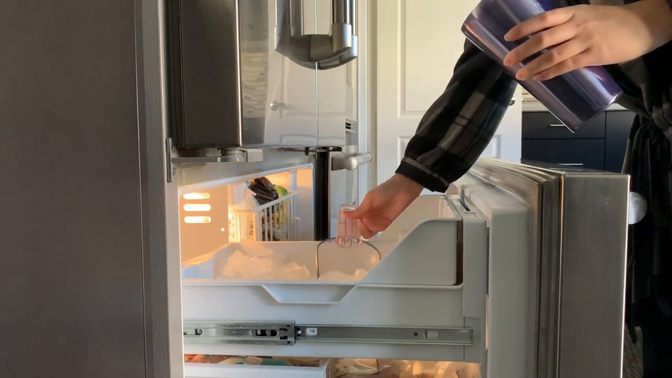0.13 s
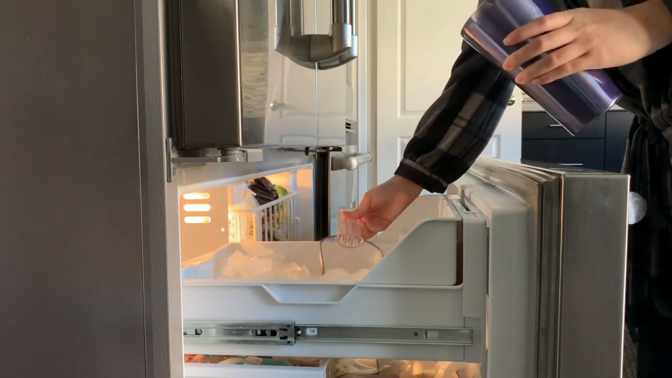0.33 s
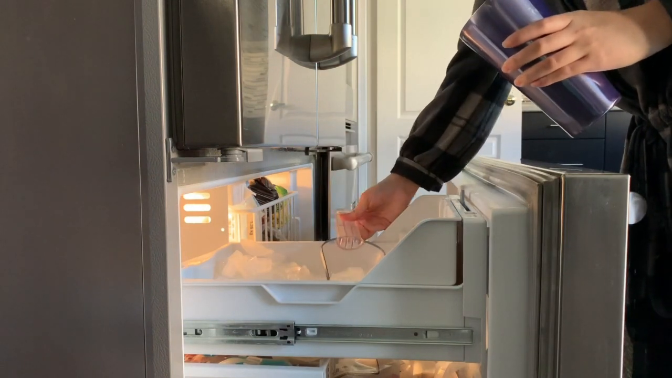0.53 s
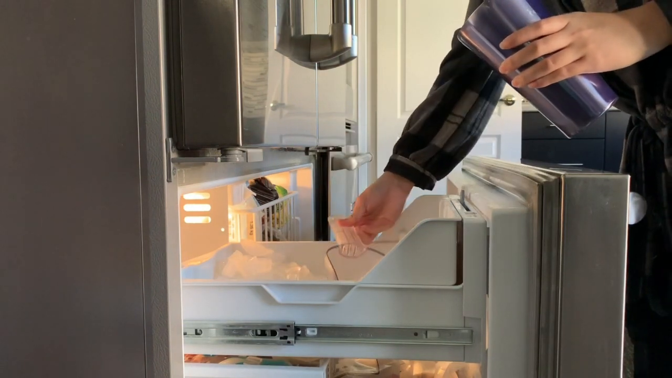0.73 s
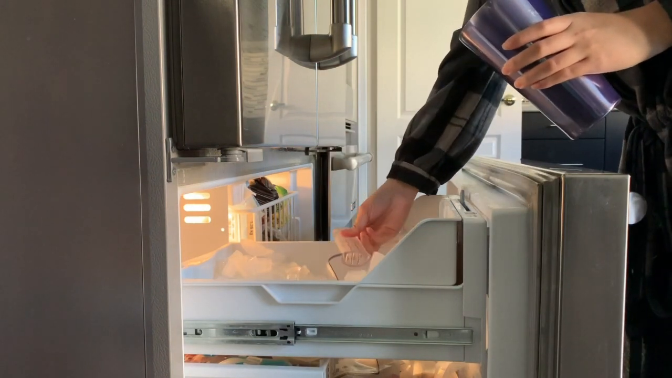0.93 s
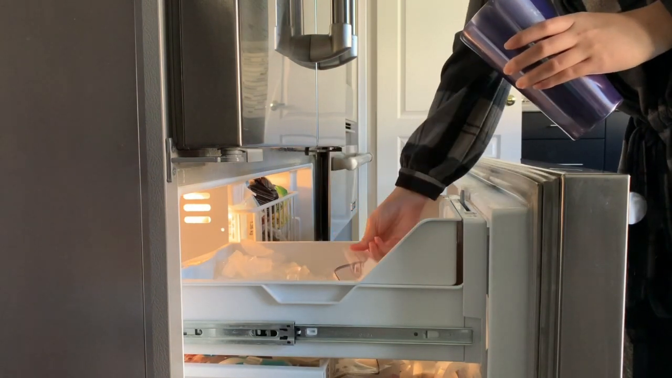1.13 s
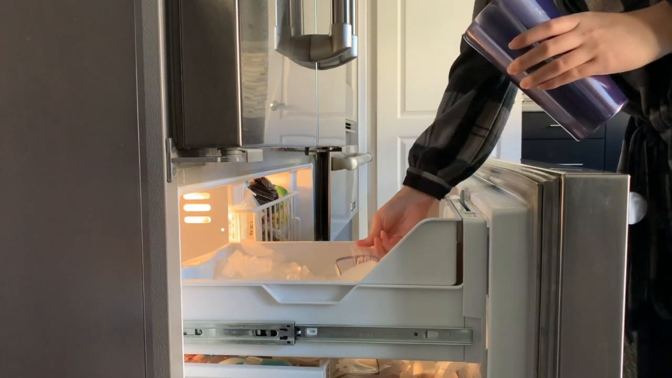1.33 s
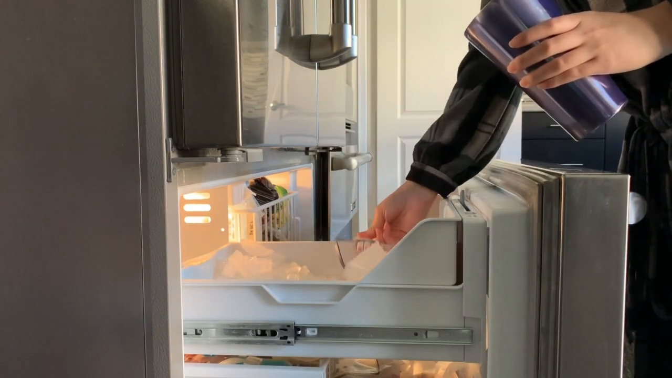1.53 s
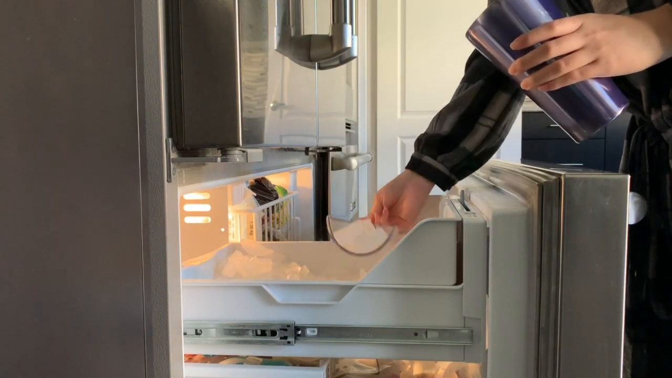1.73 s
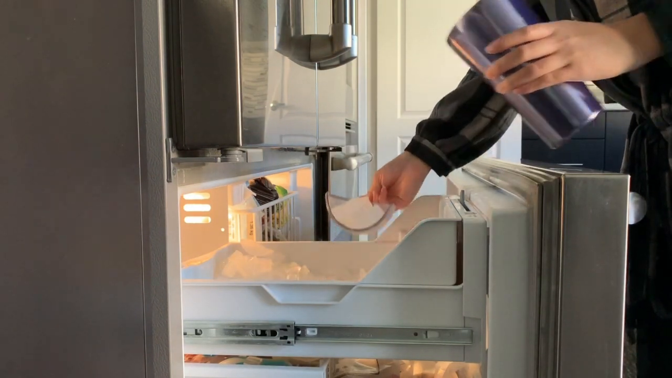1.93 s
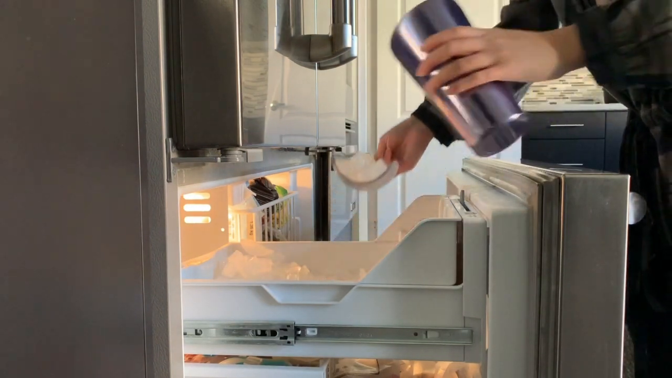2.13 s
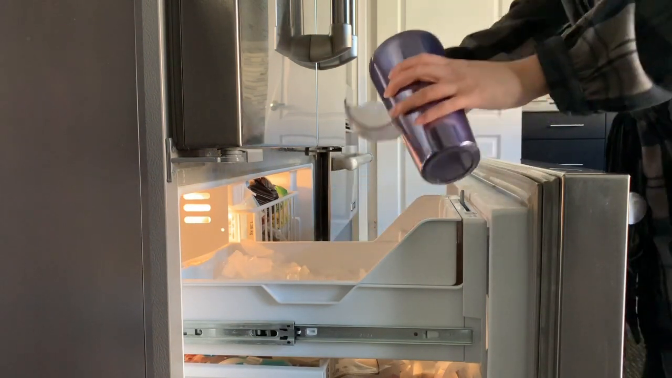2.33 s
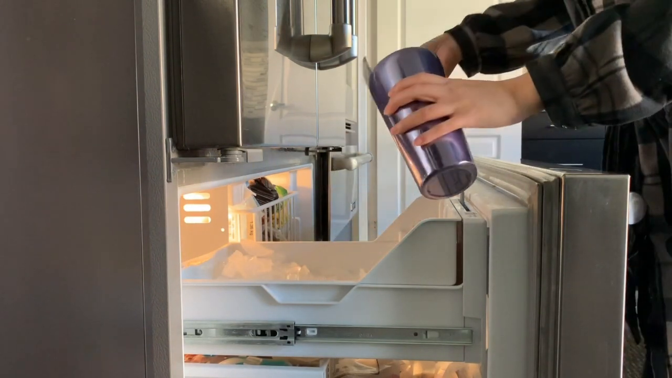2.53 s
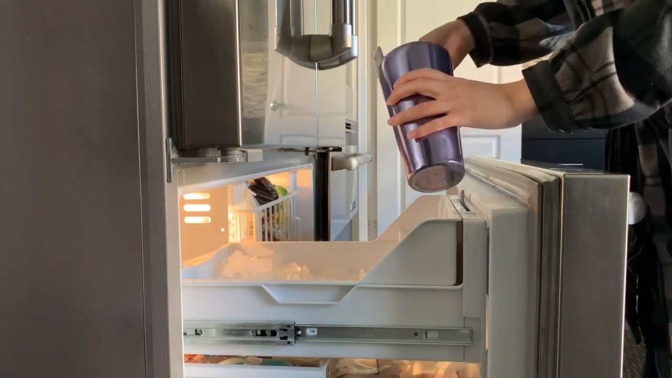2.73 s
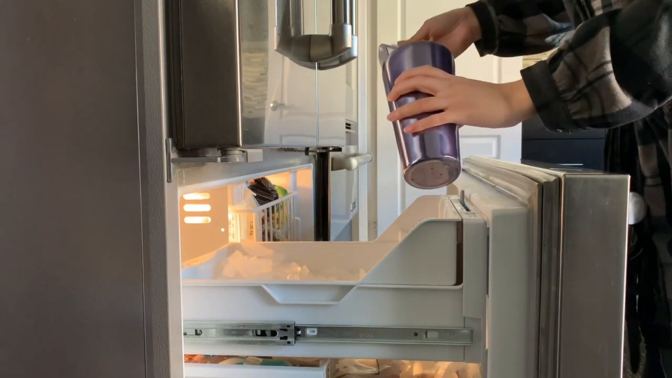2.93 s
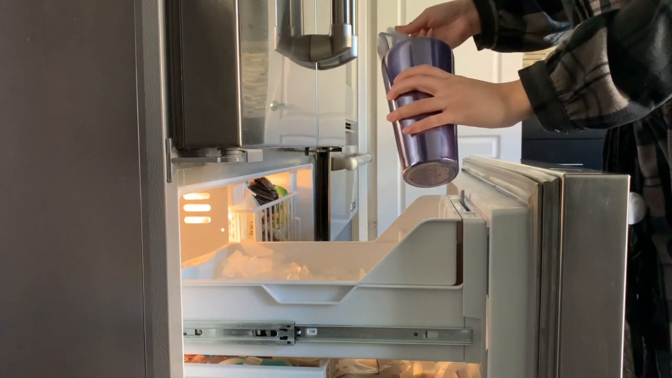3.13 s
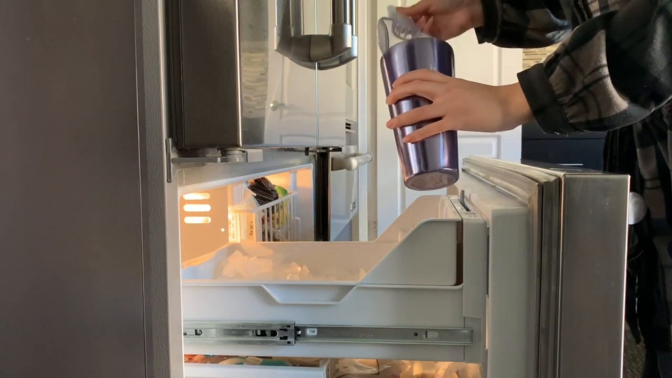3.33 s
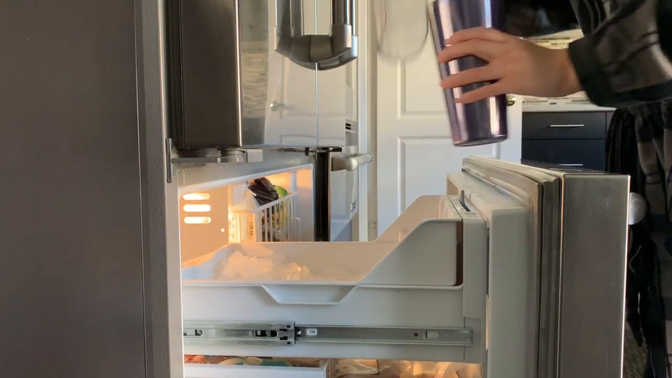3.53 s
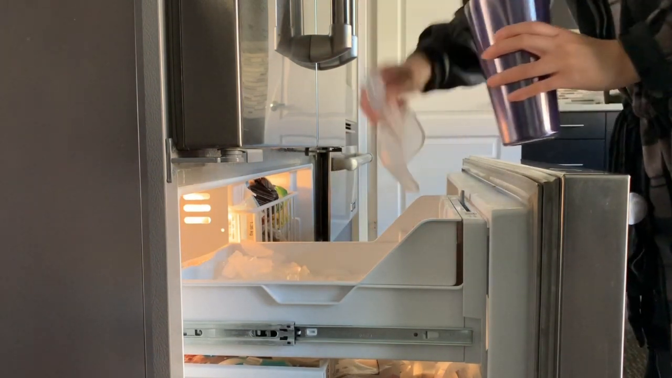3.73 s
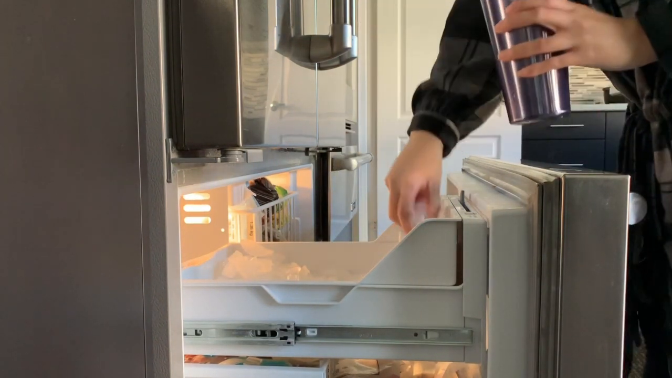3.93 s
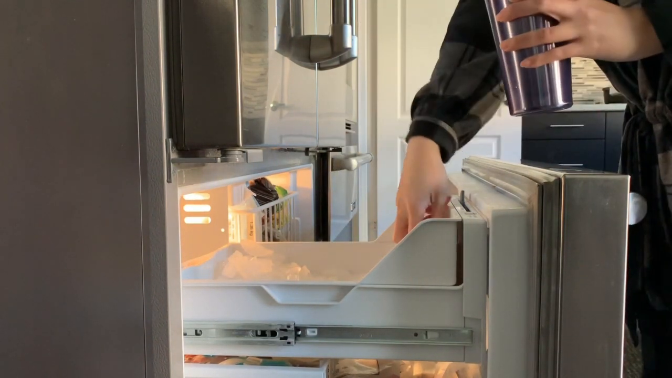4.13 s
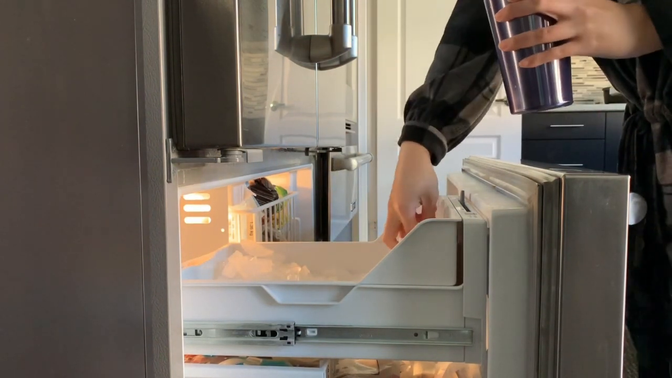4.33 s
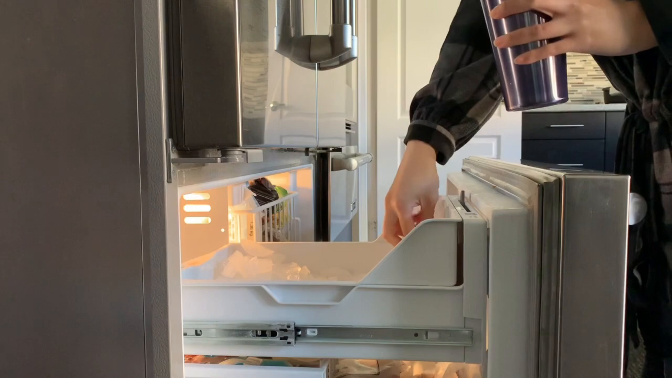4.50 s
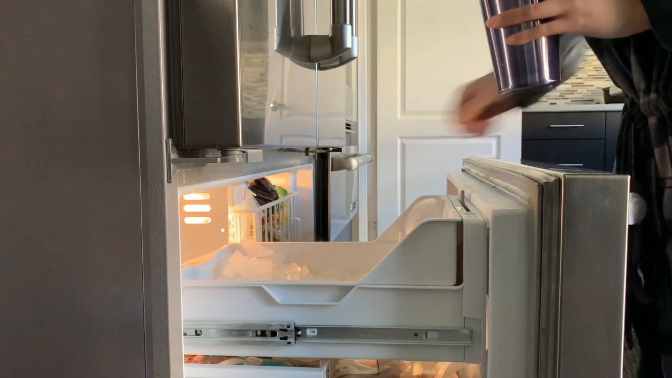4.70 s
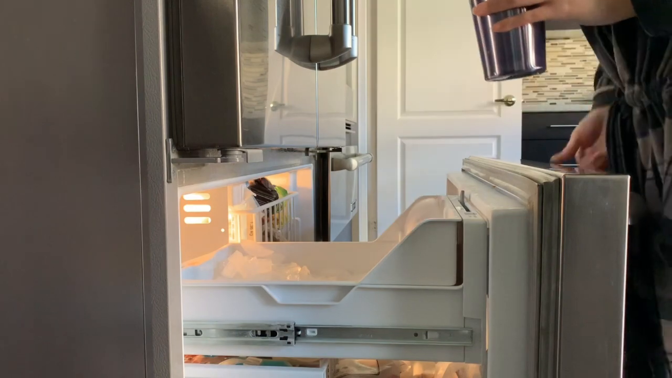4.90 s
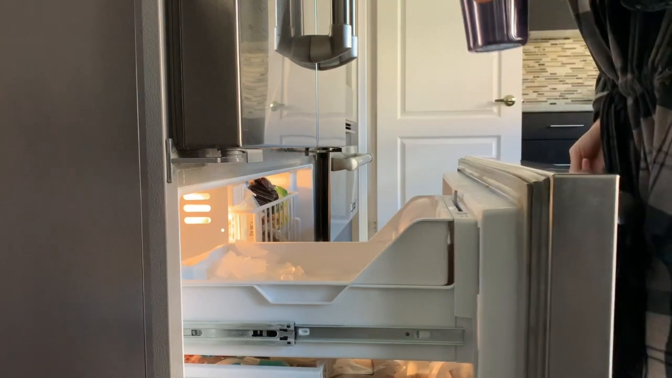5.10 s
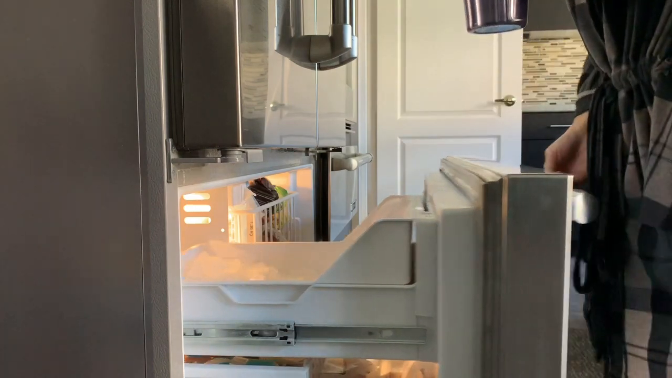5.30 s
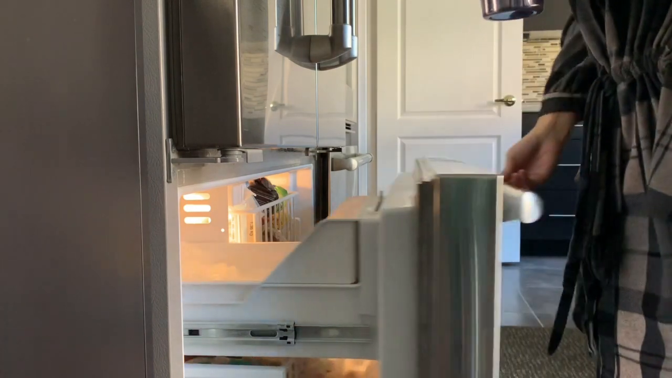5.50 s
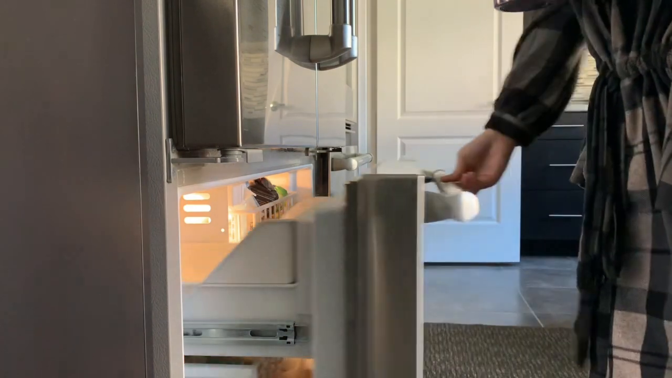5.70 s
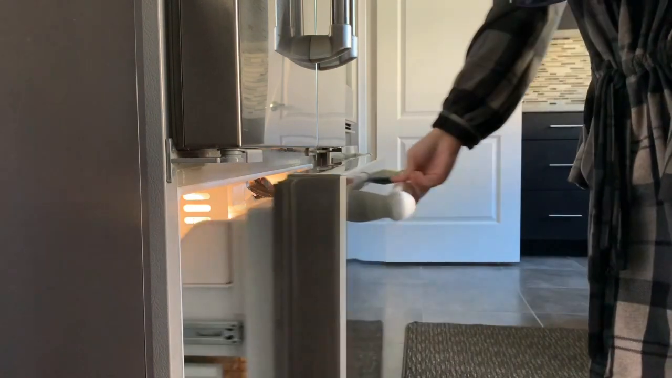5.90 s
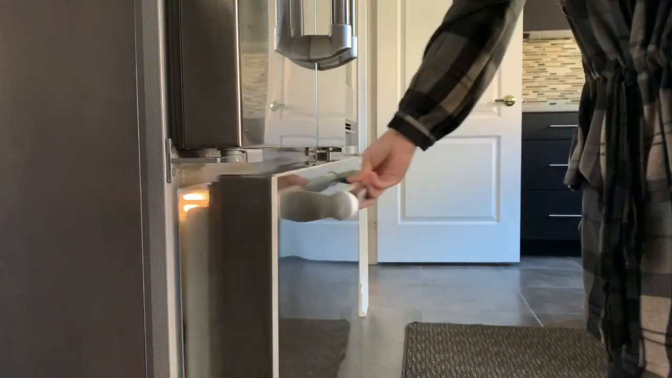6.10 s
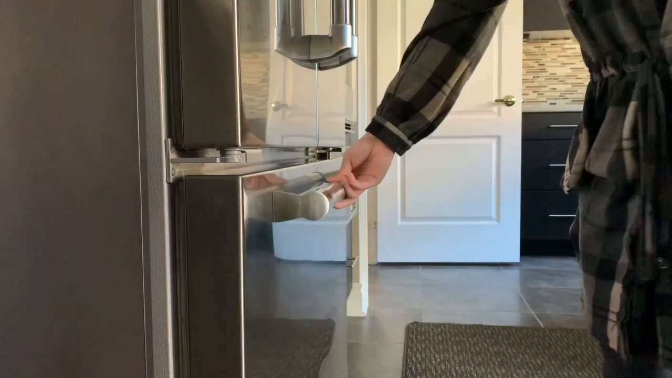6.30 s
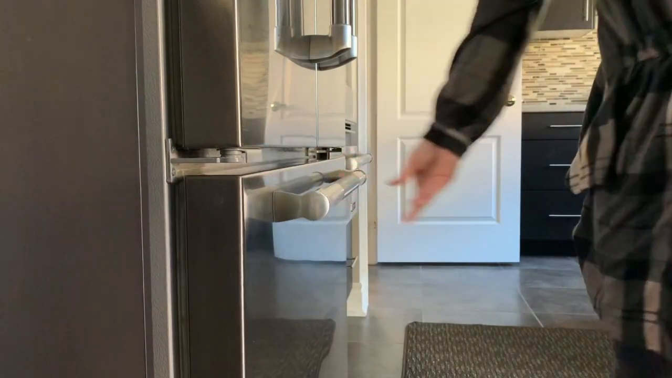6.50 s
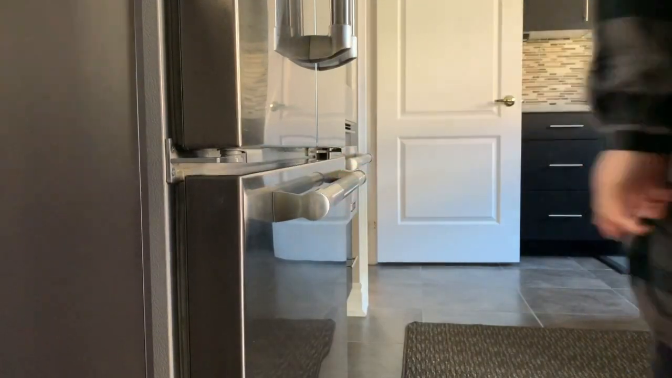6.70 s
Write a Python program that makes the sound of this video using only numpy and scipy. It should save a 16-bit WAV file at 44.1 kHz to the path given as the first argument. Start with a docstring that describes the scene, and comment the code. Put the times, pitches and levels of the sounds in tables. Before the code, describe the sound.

A small, lightly reverberant kitchen heard from close to an open freezer drawer, with low fridge hum and soft fan air throughout. From 0 to about 1.7 seconds a plastic scoop ploughs through ice cubes, grinding and crunching with many sharp knocks on the bin, strongest from 0.6 to 1.4; small cubes tick until 2.2. At 2.73 the scoop taps a steel tumbler's rim with a hollow note. From 3.1 to 3.45 cubes tumble in, ringing brightly, the ring shortening as it fills, with a last few plinks and a tiny dropout at 3.5. The empty scoop knocks at 4.0, then clatters hollowly in the bin from 4.13 to 4.35. From 5.2 the drawer rumbles along its rails, building with bumps near 5.83, a loud clack and boom at 6.11, then a latch snap and deep padded thud at 6.25-6.31, leaving hum.

```python
"""A small kitchen, with a phone close to an open freezer drawer and the fridge humming behind.
A plastic scoop digs through ice cubes, which grind and knock on the bin, then tips them into a steel tumbler.
The tumbler's wall and the air inside it ring. The empty scoop clatters back into the bin.
The drawer rolls in on its rails, latches and thuds shut. Contacts are noise cracks with decaying modes;
hum and fan are wavering tones and coloured noise."""
import sys
import numpy as np
from scipy import signal
from scipy.fft import rfft, irfft, next_fast_len
from scipy.io import wavfile
from scipy.ndimage import uniform_filter1d

SR = 44100
rng = np.random.default_rng(int(sys.argv[2]) if len(sys.argv) > 2 else 0)


def transcribe(u):
    """Save the signal u as a 16-bit wav file named by the first command-line argument.

    u: samples, shape (n,) or (channels, n), limited to [-1, 1]; the rate is SR.
    q: integer samples, one column per channel.
    """
    v = np.clip(np.atleast_2d(u).T, -1, 1)
    q = np.round(v * 32767).astype(np.int16)
    wavfile.write(sys.argv[1], SR, q)


N = 297675
TIME = np.arange(N) / SR
RING = TIME[:SR // 3]  # time within one contact

# Table levels are at the source, before the room and the microphones.
# Hardness adds to a blow's tick and takes from its thud. Crunch is the part above 5 kHz.

# Pushes of the scoop through the ice.
# Each row: start in seconds, length in seconds, level in dB, crunch in dB relative to that level.
DIG_STROKES = [(-0.02, 0.12, -26.5, -7.5), (.335, 0.089, -28.5, -4), (.505, 0.039, -30, -6.5),
               (.632, 0.025, -23.5, -7.5), (.675, 0.15, -22.5, -6.5), (.9, 0.19, -24, -6.5),
               (1.14, 0.021, -25, -3.5), (1.29, 0.085, -35, -1), (1.46, 0.28, -39, -6),
               (1.865, 0.013, -43, -17.5)]
DIG_ATTACK_S, DIG_SETTLE_DB_PER_S = 0.019, 135.5
# The loudest cubes knocking on the bin. Each row: start in seconds, level in dB, hardness in dB.
CUBE_KNOCKS = [(.086, -31.5, -2), (.2678, -32, 3.5), (.2815, -36.5, -4.5), (.319, -32.5, 4),
               (.4165, -25.5, -4.5), (.4481, -32, 0.5), (.5119, -27, -2), (.5278, -24, -1.5),
               (.5444, -48, 3.5), (.6515, -21, -1), (.6575, -22, 3), (.687, -27, 6), (.7045, -29, 1.5),
               (.7325, -26, 1), (.7403, -32.5, 14), (.7575, -29, 0.5), (.776, -33, 2), (.793, -25.5, 0.5),
               (.838, -24.5, 1), (.847, -31, -9.5), (.9005, -21, 4), (.95, -25, 2.5), (.9585, -32.5, 2.5),
               (1.0238, -26.5, -6), (1.058, -24, 1), (1.0653, -21, 2), (1.076, -20.5, -1),
               (1.098, -27.5, 0), (1.112, -28, 1), (1.1426, -29, 7.5), (1.158, -29.5, 0.5),
               (1.2179, -27.5, 11.5), (1.23, -28, 6), (1.2914, -26, 0.5), (1.3468, -23, -2.5),
               (1.3644, -29, 2.5), (1.4635, -23.5, -4.5), (1.4944, -39, 3), (1.5658, -33, -5),
               (1.6055, -32, -4), (1.6841, -29, -0.5), (1.843, -36.5, -2), (1.854, -34, -5),
               (1.8726, -30, 9), (1.8885, -29.5, -2.5), (1.9082, -31, -0.5), (1.947, -37, -4),
               (2.143, -34.5, -3.5), (2.1975, -43.5, -7)]
# Spectrum of ice cracking on plastic. Each row: frequency in Hz, relative density in dB per Hz.
ICE_COLOUR = [(54, -17), (90, -2.5), (140, -17.5), (220, -9.5), (430, 5), (700, 1.5), (1050, -0.5),
              (1500, 1.5), (2500, -0.5), (4200, -13), (5800, -25), (9000, -23.5), (15000, -28.5)]
# Modes of the plastic bin. Each row: mean frequency in Hz, mean relative level in dB, t60 in seconds.
BIN_MODES = [(198, -10, 0.063), (286, -7, 0.1), (429, -5, 0.06), (507, -7, 0.06), (614, -8, 0.06),
             (675, 0, 0.06), (880, 1, 0.05), (1005, -2, .07), (1404, -1, 0.055), (1604, -2, 0.06),
             (2180, -10, .025), (2436, -10, 0.025), (3500, -13, .025)]


def ice_bin():
    """The scoop ploughs through the cubes, which grind and knock on the plastic bin."""
    force = strokes(DIG_STROKES, DIG_ATTACK_S, DIG_SETTLE_DB_PER_S)
    grind = rattle(force, ICE_COLOUR, BIN_MODES,
                   per_s=270, spread_db=18, t60=.032, ring_db=-3, count=32)
    knocks = blows(CUBE_KNOCKS, ICE_COLOUR, BIN_MODES,
                   t60=0.04, ring_db=-9.5, thud_db=-2.0, tick_db=-5.5)
    return kitchen(grind + knocks, wet_db=-3.5)


# The scoop taps the tumbler's rim. Each row: start in seconds, level in dB, hardness in dB.
RIM_TAPS = [(2.7265, -29.5, 1), (2.7886, -39, -6)]
# Ice shifting in the scoop and leaving it: a trickle, the load, the last cubes.
# Each row: start in seconds, length in seconds, level in dB, crunch in dB relative to that level.
POUR_SLIDES = [(2.73, .08, -45, -4), (2.99, 0.09, -48, 6), (3.075, .05, -46, 9), (3.122, 0.12, -30, 7),
               (3.27, .07, -37, 7), (3.375, 0.05, -38, 2), (3.6, .1, -60, -10)]
POUR_ATTACK_S, POUR_SETTLE_DB_PER_S = 0.011, 149
# Cubes dropping in, each ringing two notes of the wall. Each row: start in seconds, level in dB,
# hardness in dB, main note in Hz, its level in dB, second note in Hz, its level in dB.
TUMBLER_HITS = [(3.0114, -43, 0, 2853, -39, 1848, -42), (3.093, -38, 4, 2853, -28, 1848, -37),
                (3.1235, -17.5, 0, 2050, -13, 2520, -19), (3.1385, -26, 6, 3591, -18, 2085, -22),
                (3.1445, -27, 3, 3296, -23, 3649, -23), (3.1644, -28, 4, 3649, -26, 2085, -23),
                (3.1991, -22.5, 3, 2806, -20, 2050, -20), (3.2195, -20.5, 7, 2571, -14, 2806, -18),
                (3.2364, -29, 4, 2806, -17, 2520, -19), (3.2555, -21, 2, 2050, -14.5, 1848, -22),
                (3.261, -26, 1, 3296, -15.5, 3210, -21), (3.2874, -28, 2, 2085, -22, 3591, -28),
                (3.3414, -29, -1, 2595, -29, 3210, -28), (3.3804, -29, 11, 2853, -26, 3210, -29),
                (3.3965, -27, 11, 1848, -25, 2755, -27), (3.4544, -34, -3, 1848, -33, 3210, -36),
                (3.533, -46, -2, 2870, -36, 1868, -46), (3.5595, -40, 9, 2885, -25, 1868, -33),
                (3.6526, -49, -5, 1848, -46, 2885, -54), (3.743, -56, -8, 1848, -53, 2885, -58)]
# The wall rings shorter as ice fills the tumbler. Each row: time in seconds, t60 in seconds.
WALL_DECAY = [(3.12, .21), (3.3, .16), (3.55, .13)]
# Spectrum of cracks on steel. Each row: frequency in Hz, relative density in dB per Hz.
STEEL_COLOUR = [(150, -50.5), (250, -18.5), (420, -8.5), (620, 0), (900, -18), (1400, -4.5), (2100, -9.5),
                (3000, -8), (3700, -7.5), (4400, -14.5), (5300, -17), (7500, -23), (10000, -19.5),
                (15000, -23.5)]
# Modes of the tumbler, covered for the rim taps and then open.
# Each row: mean frequency in Hz, mean relative level in dB, t60 in seconds.
COVERED_MODES = [(1733, -3, .12), (2067, -1, .12), (2560, 0, .12), (2805, 0, .1), (3521, -3, .12),
                 (3935, -4, .12), (4350, -4, .12)]
TUMBLER_MODES = [(1346, -1, 0.06), (1560, -1, .05), (1848, -3, .07), (2075, -2, 0.08), (2520, 0, 0.06),
                 (2595, -4, .09), (2806, -3, 0.08), (3210, -7, .08), (3296, -7, .09), (3620, -3, 0.09),
                 (4732, -10, 0.08), (5250, -7, .06), (6050, -9, 0.06), (6700, -6, 0.08)]


def tumbler():
    """The scoop taps the rim, then cubes tumble down the steel wall; the growing load damps its notes."""
    taps = blows(RIM_TAPS, STEEL_COLOUR, COVERED_MODES,
                 t60=.036, ring_db=-10, thud_db=-4.5, tick_db=-3.5)
    flow = strokes(POUR_SLIDES, POUR_ATTACK_S, POUR_SETTLE_DB_PER_S)
    slide = rattle(flow, STEEL_COLOUR, TUMBLER_MODES, per_s=190, spread_db=14, t60=0.025, ring_db=-4)
    hits = blows(TUMBLER_HITS, STEEL_COLOUR, TUMBLER_MODES,
                 t60=.03, ring_db=-6, thud_db=-10.5, tick_db=-11.0, focus_db=6)
    times, _, _, main_hz, main_db, second_hz, second_db = np.transpose(TUMBLER_HITS)
    decay = np.interp(times, *np.transpose(WALL_DECAY))
    wall = notes(times, main_hz, main_db, decay) + notes(times, second_hz, second_db, decay)
    ringing = kitchen(wall + hollow(), wet_db=-15)
    return ringing + kitchen(taps + slide + hits, wet_db=-3)


# Pushes on the air in the tumbler, its note shifting as scoop and ice cover the mouth.
# Each row: start in seconds, centre of the wavering note in Hz, level in dB.
HOLLOW = [(2.7265, 544, -21), (2.7886, 528, -30), (3.0114, 550, -40), (3.06, 560, -40), (3.093, 580, -38),
          (3.1385, 612, -23), (3.1644, 618, -23), (3.1991, 628, -19), (3.2195, 622, -19),
          (3.2555, 615, -25), (3.3414, 590, -28), (3.3965, 640, -34), (3.4544, 600, -40),
          (3.5595, 600, -48)]
HOLLOW_T60_S, HOLLOW_WAVER = .24, .022  # waver as a fraction of the pitch


def hollow():
    """The air in the tumbler: one note, topped up by each push and bent as scoop and ice cover the mouth."""
    power = np.zeros((1, N))
    for s, _, db in HOLLOW:
        push = (1 - np.exp(-RING / BODY_RISE_S)) * amp(db - 60 * RING / HOLLOW_T60_S)
        add(power, s, push[None] ** 2)
    waver = np.interp(TIME, np.linspace(0, TIME[-1], 900), rng.standard_normal(900))
    hz = np.interp(TIME, *np.transpose(HOLLOW)[:2]) * (1 + HOLLOW_WAVER * waver)
    turns = np.cumsum(hz) / SR + np.array([[0], [1 / 4]])  # second channel a quarter turn away
    return np.sqrt(2 * power) * np.sin(2 * np.pi * turns)


# The empty scoop settling in the bin.
# Each row: start in seconds, level in dB, hardness in dB, note in Hz, note level in dB.
SCOOP_KNOCKS = [(3.9851, -24.5, -3, 780, -24.5), (4.132, -38.5, 7.5, 424.6, -26.5),
                (4.1524, -34.5, -9.5, 640, -41), (4.174, -24, 2, 602, -16.5),
                (4.2013, -31, -5.5, 823, -15.5), (4.2335, -38, -4.5, 1394, -40),
                (4.2786, -21.5, 0.5, 614, -12.5), (4.2962, -23.5, 5, 436, -9), (4.3255, -22.5, 1, 840, -10),
                (4.4055, -42, -8.5, 720, -47.5), (4.5025, -41.5, 5.5, 1490, -36)]
# Loose cubes shifted by the empty scoop.
# Each row: start in seconds, length in seconds, level in dB, crunch in dB relative to that level.
CUBE_NUDGES = [(4.125, .12, -38, -12), (4.28, .06, -34, -10)]
# Spectrum of the scoop's cracks. Each row: frequency in Hz, relative density in dB per Hz.
SCOOP_COLOUR = [(114, -30), (190, -7.5), (300, -7.5), (410, -1), (800, 5), (1200, -4), (1600, -1.5),
                (2000, -10.5), (3300, -12), (6000, -27.5), (8500, -24), (11000, -30.5), (15000, -39)]
# Modes of the scoop. Each row: mean frequency in Hz, mean relative level in dB, t60 in seconds.
SCOOP_MODES = [(199, -4, .15), (300, -4, .07), (407, 2, .11), (495, 1, .06), (632, 3, .07), (671, 3, .07),
               (833, 3, .08), (1005, -4, .04), (1370, -2, .04), (1645, -1, .04)]


def scoop():
    """The empty scoop clatters into the bin, another hollow note at each knock, and nudges loose cubes."""
    knocks = blows(SCOOP_KNOCKS, SCOOP_COLOUR, SCOOP_MODES,
                   t60=.032, ring_db=-9, thud_db=0.5, tick_db=-12)
    times, _, _, hz, db = np.transpose(SCOOP_KNOCKS)
    shell = pan(notes(times, hz, db, t60=.05), left_db=4)
    nudge = strokes(CUBE_NUDGES, DIG_ATTACK_S, DIG_SETTLE_DB_PER_S)
    cubes = rattle(nudge, ICE_COLOUR, SCOOP_MODES, per_s=220, spread_db=14, t60=.025, ring_db=-5)
    return pan(kitchen(knocks + shell + cubes, wet_db=-9), left_db=1)


# The drawer gathers speed along its rails, then the closer brakes it.
# Each row: time in seconds, level in dB.
ROLL_CURVE = [(5.15, -59), (5.25, -46.5), (5.5, -35), (5.8, -34), (5.9, -25.5), (6.0, -35), (6.17, -31),
              (6.21, -32.5), (6.24, -28)]
BEARING_HISS_DB = -19.5  # roll above 5 kHz, relative to its body
# The hand takes the handle, then the drawer bumps along its rails and lands.
# Each row: start in seconds, level in dB, hardness in dB.
DRAWER_KNOCKS = [(5.012, -63, -7.5), (5.2314, -55.5, -9.5), (5.252, -52, -6.5), (5.6226, -41.5, -0.5),
                 (5.7054, -43, 0.5), (5.7568, -44.5, 10.5), (5.8195, -33.5, 16.5), (5.8255, -30, -2),
                 (5.8354, -32.5, 0), (5.8894, -51.5, -17), (5.9774, -54, -13), (6.1095, -23, 5.5),
                 (6.2425, -34, -8), (6.2574, -45, -9.5), (6.311, -29.5, -4.5)]
# The baskets shake as the door lands.
# Each row: start in seconds, length in seconds, level in dB, crunch in dB relative to that level.
SHUDDER = [(6.228, 0.13, -24, -26.5), (6.37, 0.11, -40, -45)]
SHUDDER_ATTACK_S, SHUDDER_SETTLE_DB_PER_S = 0.011, 129.5
# The door meets its seal. Each row: start in seconds, level in dB over the first 50 ms.
DOOR_THUDS = [(5.826, -36.5), (6.254, -27), (6.31, -18.5)]
SEAL_RISE_S = .006
# Spectra of the drawer's knocks and of its rolling and shaking.
# Each row: frequency in Hz, relative density in dB per Hz.
DRAWER_COLOUR = [(42, -12), (70, 11.5), (150, -4.5), (300, -0.5), (480, 7), (900, -4), (1400, -9),
                 (2100, -19), (4200, -13), (5800, -13.5), (9000, -10.5), (15000, -14.5)]
RAIL_COLOUR = [(54, -22), (90, 7), (200, 5), (430, 9.5), (700, -0.5), (1500, -9), (2200, -18), (4000, -23),
               (6000, -34.5), (9000, -31), (15000, -38)]
# Modes of the drawer and of the cabinet around it.
# Each row: mean frequency in Hz, mean relative level in dB, t60 in seconds.
DRAWER_MODES = [(242, -8, .15), (298, 13, .09), (343, 4, .16), (423.5, 4, .25), (515, 4.5, .11),
                (740, -2, .06), (1170, -7, .05), (1480, -12, .03), (4340, -9, .04)]
CABINET_MODES = [(36, 5.5, .18), (50, 4.5, .22), (64, 0, .2), (80, -3, .2), (146, 10, .2), (205, 0, .1),
                 (255, -6, .13), (390, -16, .3)]


def drawer():
    """Bearings rumble along the rails, the slides catch, and the door shakes baskets and cabinet."""
    speed = amp(np.interp(TIME, *np.transpose(ROLL_CURVE), left=-np.inf, right=-np.inf))
    roll = rattle([speed, speed * amp(BEARING_HISS_DB)], RAIL_COLOUR, DRAWER_MODES,
                  per_s=680, spread_db=10, t60=0.04, ring_db=-10)
    shake = strokes(SHUDDER, SHUDDER_ATTACK_S, SHUDDER_SETTLE_DB_PER_S)
    baskets = rattle(shake, RAIL_COLOUR, DRAWER_MODES,
                     per_s=630, spread_db=15.5, t60=0.068, ring_db=-28.5)
    knocks = blows(DRAWER_KNOCKS, DRAWER_COLOUR, DRAWER_MODES,
                   t60=0.11, ring_db=-3.5, thud_db=6.5, tick_db=-2.5)
    out = roll + rail_bumps() + baskets + knocks
    for s, db in DOOR_THUDS:
        # the soft seal spreads the push over a few milliseconds
        thud = ring(CABINET_MODES) * (1 - np.exp(-RING / SEAL_RISE_S))
        add(out, s, amp(db) * thud / rms(thud[:, :SR // 20]))
    return kitchen(out, wet_db=-8.5)


# The rollers bump along the rails and the tub booms.
# Each row: start in seconds, level in dB before the shared trim BUMP_DB, pitch in Hz.
RAIL_BUMPS = [(5.373, -25, 427), (5.537, -28, 493), (5.582, -26.5, 431), (5.604, -27.5, 420),
              (5.69, -26.5, 348), (5.731, -28, 403), (5.775, -30, 358), (5.826, -14.5, 493),
              (5.888, -11, 347), (6.0, -17.5, 466), (6.028, -18, 280), (6.06, -18.5, 401),
              (6.109, -3, 314.4), (6.234, -18.5, 300)]
BUMP_DB, BUMP_T60_S = -7, .14


def rail_bumps():
    """Each bump of the rollers makes the drawer's tub boom briefly at another pitch."""
    times, db, hz = np.transpose(RAIL_BUMPS)
    return notes(times, hz, db + BUMP_DB, t60=BUMP_T60_S)


# The closer's spring and catch. Each row: start in seconds, level in dB, hardness in dB.
LATCH_SNAPS = [(6.1025, -33, 8), (6.1085, -27, 4), (6.3055, -33, 4), (6.3095, -22.5, 0)]
# Spectrum of the snaps. Each row: frequency in Hz, relative density in dB per Hz.
LATCH_COLOUR = [(200, -8), (1400, -2), (2300, -28), (3400, -4), (4500, 1), (6000, -21), (8500, -9),
                (15000, -24)]
# Modes of the latch. Each row: mean frequency in Hz, mean relative level in dB, t60 in seconds.
LATCH_MODES = [(1440, -1, .03), (3410, -1, .015), (4300, -4, .015), (7900, -7, .015)]


def latch():
    """The sprung closer gives two double snaps: as it takes hold of the drawer and as it pulls it home."""
    snaps = blows(LATCH_SNAPS, LATCH_COLOUR, LATCH_MODES, t60=.016, ring_db=-7, thud_db=-3, tick_db=-4)
    return kitchen(snaps, wet_db=-15)


# Spectrum of the freezer fan. Each row: frequency in Hz, relative density in dB per Hz.
FAN_COLOUR = [(15, -42), (25, -27.5), (49, -7), (128, -7.5), (146, -11.5), (207, -2), (250, -11.5),
              (354, -18), (383, -8.5), (529, -19), (1150, -29.5), (1280, -21), (1500, -45), (15000, -62)]
FAN_DB = -48
# Compressor and fan tones. Each row: mean frequency in Hz, level in dB.
HUM = [(59.2, -52), (118.4, -58), (172.3, -58), (382, -64), (1244, -77), (3612, -86)]


def fridge():
    """Compressor and fan tones, wavering a little in pitch, over the rush of the freezer fan."""
    air = colour(rng.standard_normal((2, N)), FAN_COLOUR)
    tones = 0
    for hz, db in HUM:
        waver = np.interp(TIME, np.linspace(0, TIME[-1], 100), rng.standard_normal(100))
        turns = np.cumsum(hz * (1 + .006 * waver)) / SR + rng.random((2, 1))
        tones = tones + amp(db) * np.sqrt(2) * np.sin(2 * np.pi * turns)
    return amp(FAN_DB) * air / rms(air) + tones


# Reverberation of the small kitchen. Each row: frequency in Hz, t60 in seconds.
KITCHEN = [(100, 0.48), (300, 0.54), (1800, 0.53), (4800, 0.48), (9000, 0.26), (15000, 0.16)]


def kitchen(x, wet_db):
    """Direct sound plus a diffuse tail that dies soonest in the treble."""
    t = TIME[:SR]
    hz = np.fft.rfftfreq(SR, 1 / SR)
    noise = rfft(rng.standard_normal((2, SR)))
    centres = [f for f, _ in KITCHEN]
    tail = 0
    # overlapping bands of noise, each with its own decay
    for share, (_, t60) in zip(np.eye(len(KITCHEN)), KITCHEN):
        tail = tail + irfft(noise * on_log(hz, np.c_[centres, share])) * amp(-60 * t / t60)
    tail = tail * (1 - np.exp(-t / 0.00064))
    tail = tail / rms(tail) / np.sqrt(SR)
    return x + amp(wet_db) * signal.fftconvolve(x, tail, axes=1)[:, :N]


def strokes(table, attack_s, settle_db_per_s):
    """Strength of a movement and of its crunch: each stroke swells, holds to its length, then dies away."""
    power = 0
    for s, length, db, crunch in table:
        settle = amp(-settle_db_per_s * np.maximum(TIME - s - length, 0))
        swell = np.clip((TIME - s) / attack_s, 0, 1) * settle
        power = power + (swell * amp([[db], [db + crunch]])) ** 2
    return np.sqrt(power)


def rattle(force, spectrum, modes, per_s, spread_db, t60, ring_db, count=16):
    """Many small contacts of differently ringing pieces; the force sets the strength of body and top."""
    first, last = np.flatnonzero(force[0] > amp(-85))[[0, -1]]
    grains = 0
    for _ in range(count):
        chance, size = rng.random((2, N))[:, first:last]
        pushes = (chance < per_s / count / SR) * amp(spread_db * size ** 2)
        piece = contact(spectrum, modes, t60, ring_db)
        grains = grains + signal.fftconvolve(pushes[None], piece, axes=1)[:, :last - first]
    body, top = np.zeros((2, 2, N))
    body[:, first:last] = even(band(grains, 40, 5000))
    top[:, first:last] = even(band(grains, 5000, 16000))
    return force[0] * body + force[1] * top


FOCUS_OCTAVES = .35  # reach of the crack's gathering around a note


def blows(table, spectrum, modes, t60, ring_db, thud_db, tick_db, focus_db=0, count=2):
    """Separate blows; a harder one has more tick, less thud. The crack can gather around the blow's note."""
    out = np.zeros((2, N))
    for s, db, hardness, *note in table:
        hit = contact(spectrum, modes, t60, ring_db)
        if focus_db:
            hit = shape(hit, lambda hz: amp(
                focus_db * np.exp(-(np.log2((hz + 1) / note[0]) / FOCUS_OCTAVES) ** 2)))
        # thud, body and tick of the first 20 ms are brought to strength, in repeated passes
        strength = amp([db + thud_db - hardness, db, db + tick_db + hardness])
        for _ in range(count):
            attack = [rms(band(hit[:, :SR // 50], *edges))
                      for edges in [(150, 900), (900, 4500), (4500, 16000)]]
            hit = colour(hit, np.c_[(500, 2000, 8000), 20 * np.log10(strength / attack)])
        add(out, s, hit)
    return out


BODY_RISE_S = 0.0012  # the tick comes first, the body builds up behind it
TREBLE_HZ = 5230  # the tick of a contact lies above this frequency, its body below


def contact(spectrum, modes, t60, ring_db, vary_db=5.0):
    """One contact: a crack of dense, quickly damped modes in its own colour, then the object's ring."""
    ripple = np.c_[np.geomspace(400, 16000, 36), vary_db * rng.standard_normal(36)]
    low, high = rng.standard_normal((2, 2, len(RING)))
    low, high = band(low, 20, TREBLE_HZ), band(high, TREBLE_HZ, 20000)
    rise = 1 - np.exp(-RING / BODY_RISE_S)
    crack = (low * rise + high) * amp(-60 * RING / t60)
    crack = shape(crack, lambda hz: amp(on_log(hz, spectrum) + on_log(hz, ripple)))
    return crack / rms(crack) + amp(ring_db) * rise * ring(modes)


def ring(modes):
    """Decaying modes; every contact weights them anew. The second channel is a quarter turn away."""
    out = 0
    for hz, db, t60 in modes:
        weight = amp(db + 2 * rng.standard_normal()) * np.exp(2j * np.pi * rng.random())
        ports = np.array([[1], [rng.choice([1j, -1j])]])
        hz = hz * (1 + 0.0024 * rng.standard_normal())
        decay = np.log(1000) / t60
        out = out + (weight * ports * np.exp((2j * np.pi * hz - decay) * RING)).imag
    return out / rms(out)


def notes(times, pitches, levels, t60):
    """A mode that each blow excites strongly, ringing on after its crack; one t60 for all or one per blow."""
    out = np.zeros((2, N))
    for s, hz, db, decay in zip(times, pitches, levels, np.broadcast_to(t60, len(times))):
        turns = hz * RING + rng.random() + np.array([[0], [1 / 4]])
        fade = (1 - np.exp(-RING / BODY_RISE_S)) * amp(db - 60 * RING / decay)
        add(out, s, np.sqrt(2) * fade * np.sin(2 * np.pi * turns))
    return out


def amp(db):
    """Decibels to gain."""
    return 10 ** (np.asarray(db) / 20)


def rms(x):
    """Root mean square."""
    return np.sqrt(np.mean(x ** 2)) + 1e-12


def on_log(hz, points, axis=1):
    """One column of a table, joined by lines over log frequency."""
    points = np.array(points)
    return np.interp(np.log(hz + 1), np.log(points[:, 0]), points[:, axis])


def shape(x, gain):
    """Filter by a gain that is a function of frequency, causally so that attacks stay sharp."""
    size = next_fast_len(x.shape[-1] // 2 + 2048) * 2
    # folding the cepstrum gives the minimum-phase filter
    cepstrum = irfft(np.log(gain(np.fft.rfftfreq(size, 1 / SR)) + 1e-6))
    cepstrum[1:size // 2] *= 2
    cepstrum[size // 2 + 1:] = 0
    return irfft(rfft(x, size) * np.exp(rfft(cepstrum)))[..., :x.shape[-1]]


def colour(x, spectrum):
    """Give a sound a spectrum."""
    return shape(x, lambda hz: amp(on_log(hz, spectrum)))


def band(x, lo_hz, hi_hz):
    """Band-pass."""
    return signal.sosfilt(signal.butter(3, [lo_hz, hi_hz], "band", fs=SR, output="sos"), x + 1e-18)


def even(x):
    """Level out slow swells and keep the fine grain."""
    power = uniform_filter1d(np.mean(x ** 2, axis=0), SR // 14)
    return x / np.sqrt(power + 1e-3 * rms(x) ** 2)


def pan(x, left_db):
    """Lean a source to the left."""
    return x * amp([[left_db / 2], [-left_db / 2]])


def add(out, s, sound):
    """Mix a sound in at a time."""
    start = max(int(s * SR), 0)
    out[:, start:start + sound.shape[-1]] += sound[:, :N - start]


# The phone's two microphone ports.
# Each row: frequency in Hz, likeness from 0 to 1, left minus right gain in dB.
PORTS = [(30, .995, 0), (60, .97, 0), (200, .9, .4), (400, .82, .8), (700, .45, 3.4), (1300, .42, 1),
         (2500, .1, 2.3), (4200, .1, -1.2), (5500, .1, -1), (7500, .92, -.4), (15000, .92, -.4)]
PORT_LAG_S, LAG_ABOVE_HZ = .000256, 5000


def scene():
    """All sources at two close ports: bass alike, middle diffuse, treble a little later on the left."""
    near, other = rfft(ice_bin() + tumbler() + scoop() + drawer() + latch() + fridge())
    hz = np.fft.rfftfreq(N, 1 / SR)
    alike = np.clip(on_log(hz, PORTS), 0, 1)
    lean_db = on_log(hz, PORTS, axis=2)
    # the lag sets in over 1500 Hz
    lag_s = PORT_LAG_S * np.clip((hz - LAG_ABOVE_HZ) / 1500, 0, 1)
    left = (alike * near + np.sqrt(1 - alike ** 2) * other) * np.exp(-2j * np.pi * hz * lag_s)
    return irfft(np.array([left * amp(lean_db / 2), near * amp(-lean_db / 2)]), N)


# An instant of silence at the phone. The two columns: start in seconds, end in seconds.
DROPOUT = (3.503, 3.527)
TOP_HZ = 15900


def record(dry):
    """The sound drops out for an instant during the pour; the phone caps the peaks and cuts the top."""
    silent = (TIME > DROPOUT[0]) & (TIME < DROPOUT[1])
    live = uniform_filter1d(1. - silent, size=64)  # short fades at both edges
    low_pass = signal.ellip(8, .2, 70, TOP_HZ, fs=SR, output="sos")
    return signal.sosfilt(low_pass, np.clip(dry * live, -1, 1))


dry = scene()
out = record(dry)
transcribe(out)
```